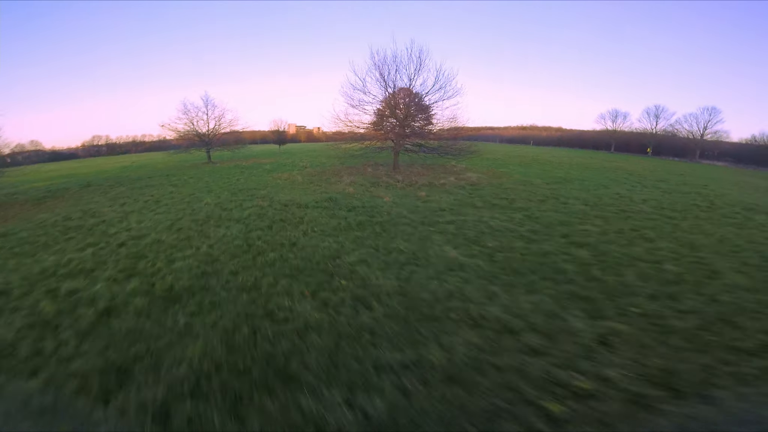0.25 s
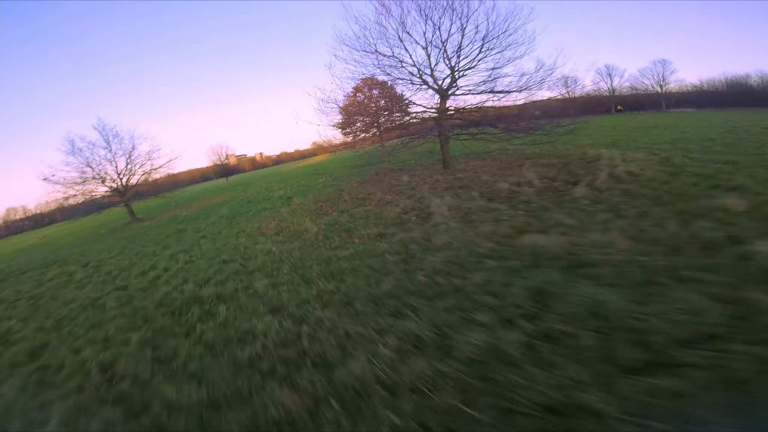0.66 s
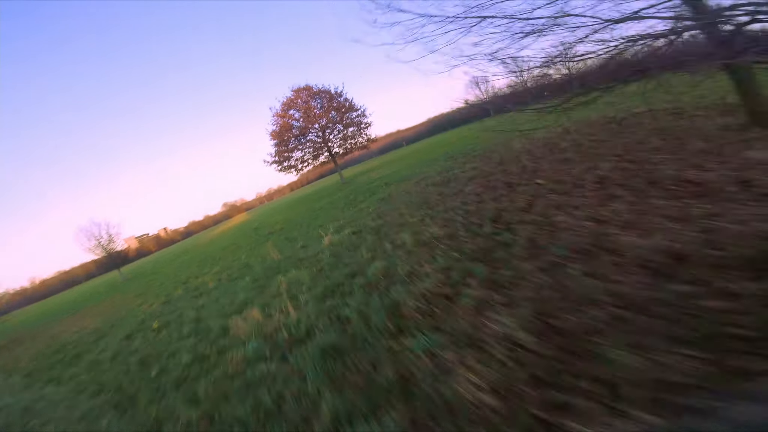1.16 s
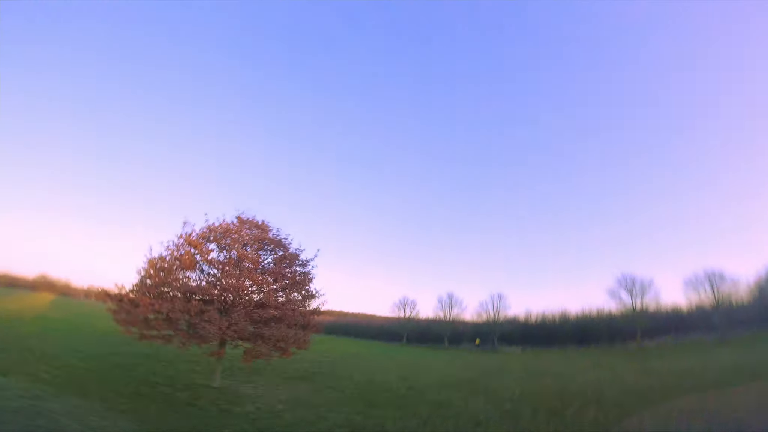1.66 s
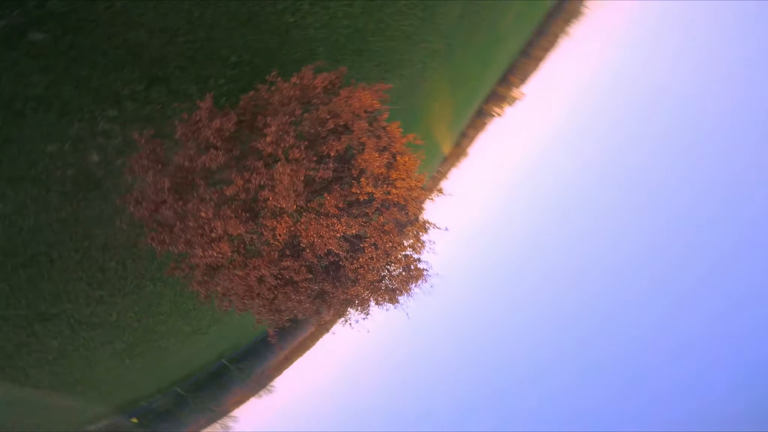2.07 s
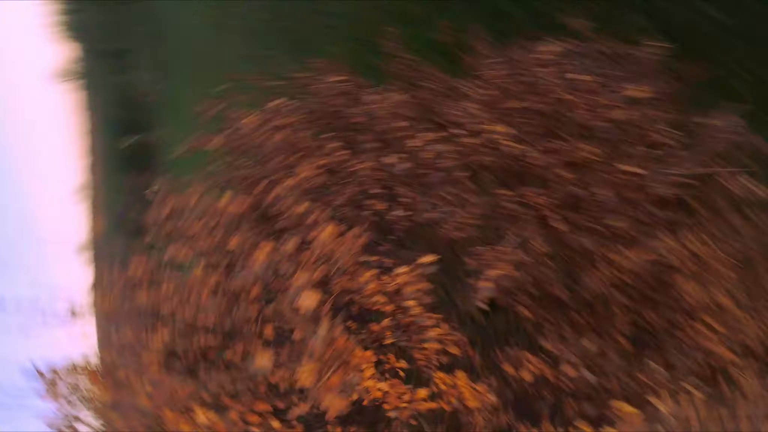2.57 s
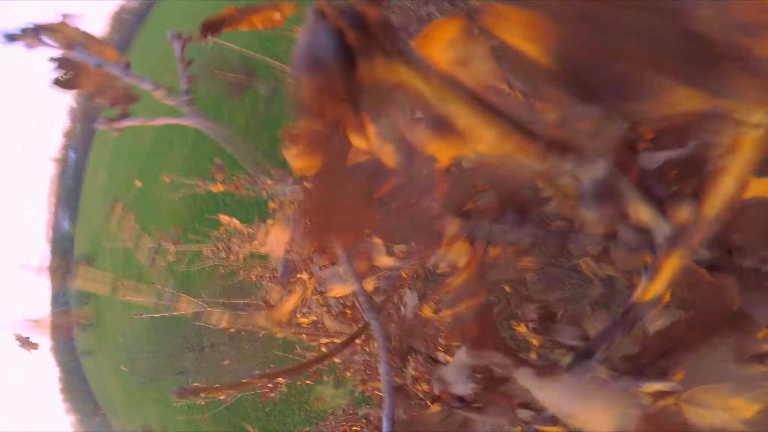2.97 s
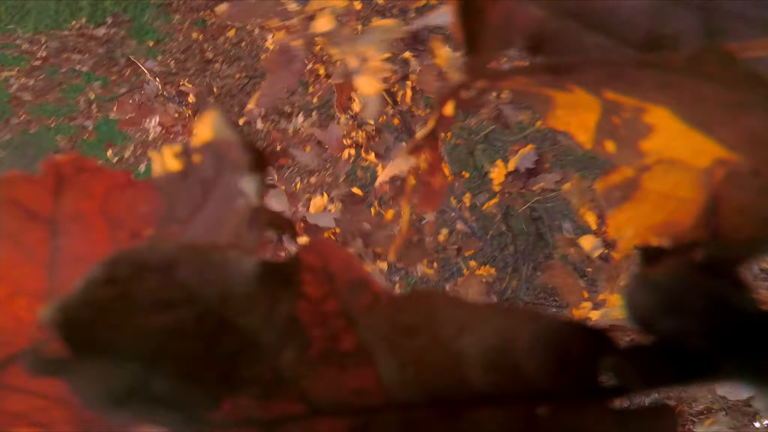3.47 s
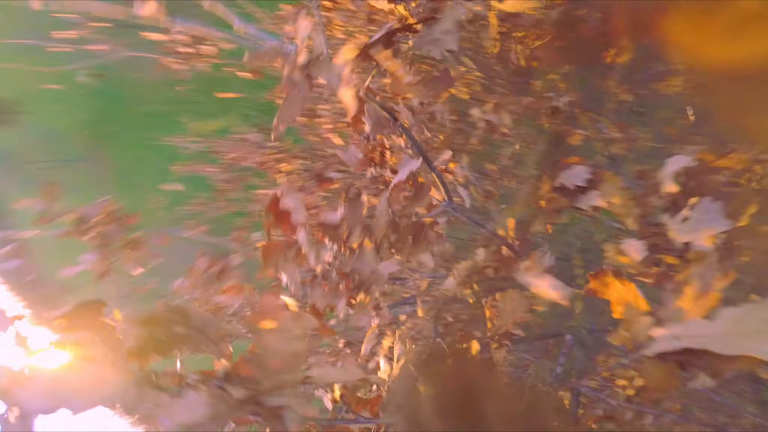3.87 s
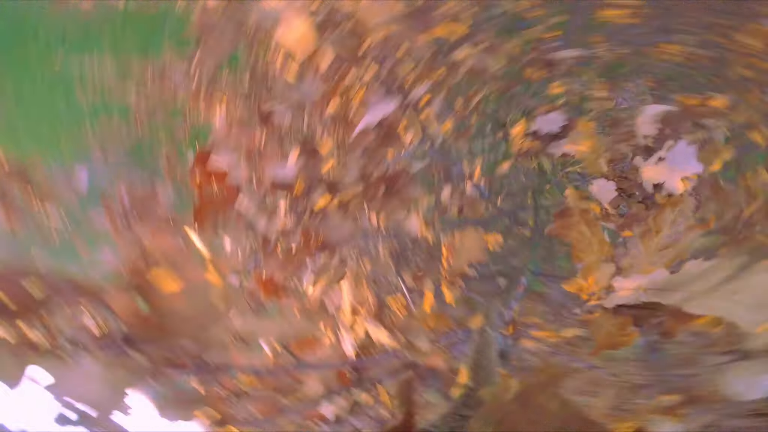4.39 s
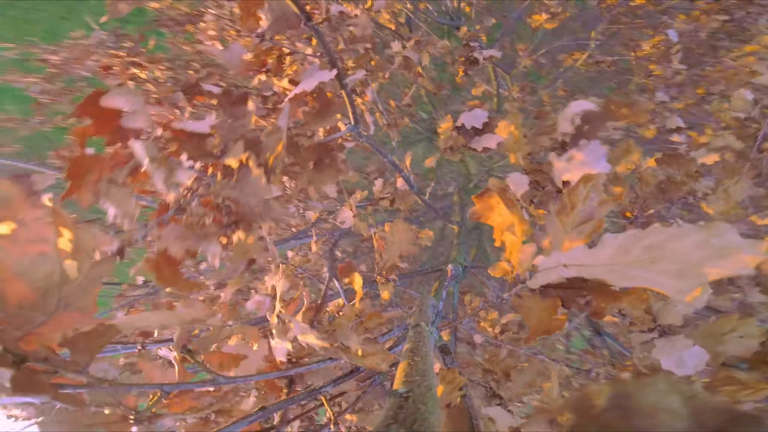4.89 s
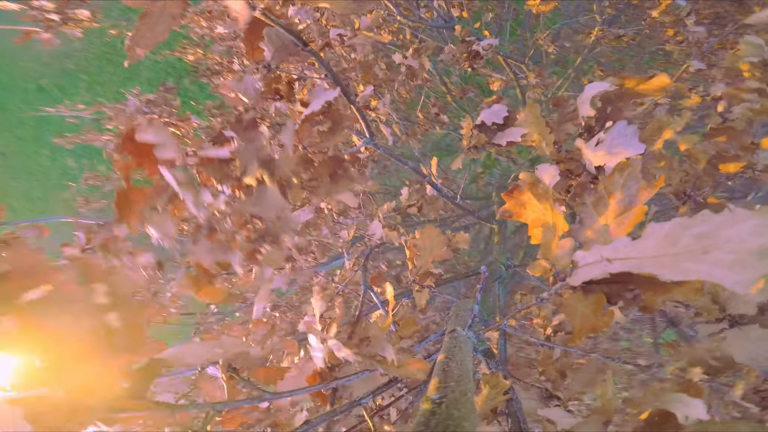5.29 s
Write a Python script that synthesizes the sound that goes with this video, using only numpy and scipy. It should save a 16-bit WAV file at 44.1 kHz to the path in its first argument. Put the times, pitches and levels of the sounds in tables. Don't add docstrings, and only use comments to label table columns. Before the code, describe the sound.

Buzzing drone motors surge and sink, a hard crash and stuttering stalls among branches follow, then sparse dry leaves tick and brush.

```python
import sys
import numpy as np
from scipy import signal
from scipy.fft import rfft, irfft
from scipy.io import wavfile
from scipy.ndimage import uniform_filter1d

SR = 44100
rng = np.random.default_rng(int(sys.argv[2]) if len(sys.argv) > 2 else 0)


def attenuation_scalar(level_db):
    decades = np.asarray(level_db, float) / 20
    return 10 ** decades


def persist_wave(psi):
    counts = np.round(np.clip(psi, -1, 1) * 32767).astype(np.int16)
    wavfile.write(sys.argv[1], SR, np.atleast_2d(counts).T)


N = 244314
T = np.arange(N) / SR

# [t/s, shaft f/Hz, blade tone level/dB]
LEAD_MOTOR = [(0, 258.2, -21), (.32, 233.6, -22), (.8, 231.5, -18), (.9, 249.7, -19.5), (1.04, 284.6, -20),
              (1.48, 370.3, -18.5), (1.58, 389.1, -21.5), (1.63, 374.4, -18), (1.69, 250.6, -20),
              (1.72, 162.7, -22.5), (1.84, 143.7, -13.5), (1.88, 110.6, -28), (1.99, 94.3, -14),
              (2.2, 79.84, -25.5), (2.48, 95.8, -13.5), (2.58, 149.6, -21), (2.66, 298.7, -20.5),
              (2.708, 348.3, -13.5)]
# [f/Hz, density/dB per Hz]
CRACKLE_COLOUR = [(3000, -18), (5000, -8), (8000, -3), (12000, -1.5), (16000, -6)]


def level(x, db):
    return x * attenuation_scalar(db) / np.sqrt(np.mean(x ** 2))


def columns(rows, fade_s=0.017):
    s, *values = np.transpose(rows)
    edge = np.minimum(T - s[0] + fade_s, s[-1] + fade_s - T)
    gate = np.clip(edge / fade_s, 0, 1)
    return [np.interp(T, s, v) for v in values] + [gate]


def colour(x, points, size=4096):
    hz, db = np.transpose(points)
    grid = np.log(np.arange(size // 2 + 1) * SR / size + 1)
    cepstrum = irfft(np.interp(grid, np.log(hz), db) * np.log(10) / 20)
    cepstrum[1:size // 2] *= 2
    cepstrum[size // 2 + 1:] = 0
    impulse = irfft(np.exp(rfft(cepstrum)))
    return signal.fftconvolve(x, impulse)[:len(x)]


def walk(rate):
    hold = int(SR / rate)
    steps = np.repeat(rng.standard_normal(N // hold + 1), hold)
    return 1.3 * uniform_filter1d(uniform_filter1d(steps, hold), hold)[:N]


def ring(hz, width_hz, size=3000):
    t = np.arange(size) / SR
    return np.sin(2 * np.pi * hz * t) * np.exp(-np.pi * width_hz * t)


def propeller(course, overtones, wobble, flutter_db, twice_db, top_db, unbalance_db, idle_hz=195, pole_db=-90):
    # [f/Hz, level/dB]
    frame_pass = [(45, -49), (90, -11), (150, -16), (200, 0.9), (235, -5.5), (290, -3.5), (350, -18.5),
                  (450, 11)]
    # [f/Hz, level/dB]
    arm_pass = [(400, -20), (450, 6), (650, 2.5)]
    idle_dull_db = 8.5
    brake_dull_db = .004
    gentle_hz_per_s = 650
    unloaded_s, linger = 0.14, 3
    magnets = 14
    pole_fade_db, pole_idle_hz = 24, 95
    hz, blade_db, gate = course

    uneven = wobble * np.clip(200 / hz, 1, 2.6) ** 1.19 * walk(60)
    turn = 2 * np.pi * (np.cumsum(hz * (1 + uneven)) / SR + rng.random())
    *first, fall_db = overtones
    gains = [0, *first] + [first[-1] + fall_db * k for k in range(1, 9)]

    dull_db = idle_dull_db * np.clip(np.log2(hz / idle_hz), -2, 0)
    slope = uniform_filter1d(np.gradient(hz) * SR, 800)
    braking = np.clip(slope + gentle_hz_per_s, -2500, 0)
    keep = np.exp(-1 / (unloaded_s * SR))
    unloaded = signal.lfilter([1 - keep], [1, -keep], braking)
    dull_db = dull_db + brake_dull_db * (0.2 * braking + linger * unloaded)
    flutter_db = flutter_db - 0.16 * dull_db

    blades = np.zeros(N)
    for k, db in enumerate(gains):
        multiple = 3 * (k + 1)
        housing_db = top_db * np.log2(np.maximum(multiple * hz / 2300, 1))
        flutter = flutter_db * np.clip(walk(45), -3, 1.5)
        tone_db = db + min(k, 2) * dull_db - housing_db + flutter
        blades += attenuation_scalar(tone_db) * np.sin(multiple * turn + k * k)

    shaft_db = unbalance_db + np.interp(hz, *np.transpose(frame_pass))
    shake_db = shaft_db + 0.023 * unloaded + 0.27 * flutter_db * walk(25)
    arm_db = twice_db + np.interp(2 * hz, *np.transpose(arm_pass)) + flutter_db * walk(40)
    fade_db = pole_fade_db * np.log2(np.maximum(hz / pole_idle_hz, 1))
    whistle_db = pole_db - fade_db + 4.5 * np.minimum(walk(30), 1)
    shake = attenuation_scalar(shake_db) * np.sin(turn)
    twice = attenuation_scalar(arm_db) * np.sin(2 * turn)
    poles = attenuation_scalar(whistle_db) * np.sin(magnets * turn)
    return np.sqrt(2) * gate * (attenuation_scalar(blade_db) * blades + shake + twice + poles)


def free_motors():
    # [t/s, shaft f/Hz, blade tone level/dB]
    second = [(0, 222.5, -18.5), (0.351, 203, -20.5), (0.601, 201.4, -22), (.81, 198, -21.5),
              (0.9, 207, -18), (1.051, 234.6, -14.5), (1.37, 287.8, -13.5), (1.571, 321.5, -12),
              (1.62, 311.4, -13), (1.661, 252.7, -21), (1.71, 150, -22.5), (1.78, 131, -25),
              (1.86, 45, -18.5), (1.899, 44.02, -11), (1.98, 43.5, -9.5), (2.02, 43.9, -21),
              (2.12, 43.72, -11.5), (2.17, 43.5, -22)]
    third = [(0, 210.2, -17.5), (0.351, 180.2, -17), (0.799, 177.2, -16), (0.899, 195.3, -20),
             (1.2, 259, -16.5), (1.3, 295.2, -28), (1.58, 335.2, -23.5), (1.641, 291.2, -18.5),
             (1.698, 169.6, -38), (1.78, 101.2, -23), (1.901, 96.7, -28), (2, 70, -32), (2.1, 69.7, -19),
             (2.2, 68.1, -16), (2.279, 39.5, -13.5), (2.4, 38.8, -19.5), (2.5, 43.7, -15.5),
             (2.681, 39.6, -21.5)]
    fourth = [(0, 194, -30.5), (0.303, 172.1, -32.5), (0.702, 162.9, -33.5), (0.798, 167.2, -31),
              (1, 185.2, -35.5), (1.15, 196, -56.5)]
    # [2nd level/dB, 3rd level/dB, 4th level/dB, further fall/dB]
    timbres = [(-6, -12, -14, -10), (-10, -19.5, -28, -8), (-9.5, -29.5, -22, -9), (6.5, 1, -16.5, -12)]
    unbalances = (-28.5, -9.5, -16.5, -31.5)
    pole_levels = (-33, -42, -36, -60)
    twice_levels = (-38.0, -35.5, -75.5, -51)
    courses = (LEAD_MOTOR, second, third, fourth)
    out = np.zeros(N)
    for rows, timbre, twice_db, unbalance_db, pole_db in zip(
            courses, timbres, twice_levels, unbalances, pole_levels):
        out += propeller(columns(rows), timbre, 0.00488, 1.0, twice_db, .2, unbalance_db, pole_db=pole_db)
    return out


def fighting_motor():
    # [t/s, shaft f/Hz, blade tone level/dB]
    grab = [(2.488, 150, -50), (2.5, 172, -21), (2.518, 235, -22), (2.53, 345, -25), (2.55, 415, -22),
            (2.582, 420, -21), (2.588, 420, -60)]
    spin_up = [(2.592, 90, -60), (2.6, 105, -21), (2.62, 180, -18), (2.645, 270, -17), (2.67, 385, -18),
               (2.705, 428, -16), (2.72, 428, -60)]
    sputter = [(3.03, 55, -60), (3.045, 70, -19), (3.07, 185, -16), (3.097, 265, -16), (3.11, 240, -28),
               (3.14, 228, -29), (3.175, 105, -32), (3.19, 80, -60)]
    climb = [(3.275, 45, -60), (3.29, 52, -17), (3.33, 138, -16), (3.36, 165, -22), (3.38, 204, -19),
             (3.4, 258.5, -12), (3.425, 258, -15), (3.44, 284, -22), (3.455, 284, -50)]
    sag = [(3.485, 262, -50), (3.5, 260, -26), (3.52, 259, -19), (3.54, 243, -18), (3.56, 228.5, -24),
           (3.578, 185, -24), (3.6, 178, -20), (3.62, 193, -21), (3.63, 193, -50)]
    # [2nd level/dB, 3rd level/dB, 4th level/dB, further fall/dB]
    timbre = (-10, -21, -25, -5)
    course = columns(grab + spin_up + sputter + climb + sag)
    return propeller(course, timbre, .02, 2.6, -43.5, 3, -91, idle_hz=150)


def surge_course():
    # [t/s, length/s, from f/Hz, to f/Hz, blade tone level/dB]
    bursts = [
        (2.484, 0.059, 61.4, 67, -12.5),
        (2.867, 0.035, 402, 320, -9),
        (2.925, 0.07, 100.3, 135, -13),
        (3.21, 0.056, 242.3, 257, -19),
        (3.628, 0.0361, 146.8, 81.5, -20),
        (3.68, 0.33, 79.4, 76, -47.5),
    ]
    ease, swell = 2.2, 1
    hz, db, gate = np.full(N, 100.), np.full(N, -60.), np.zeros(N)
    for s, length, from_hz, to_hz, top_db in bursts:
        u = (T - s) / length
        on = (u >= 0) & (u < 1)
        hz[u >= 0] = to_hz
        hz[on] = to_hz + (from_hz - to_hz) * (1 - u[on]) ** ease
        db[on] = top_db
        gate[on] = np.sin(np.pi * u[on]) ** swell
    return hz, db, gate


def surging_motors():
    # [2nd level/dB, 3rd level/dB, 4th level/dB, further fall/dB]
    timbre = (-15, -32, -35, -7)
    return propeller(surge_course(), timbre, .03, 4.9, -40, 4.4, -36.0)


def freed_motor():
    # [t/s, shaft f/Hz, blade tone level/dB]
    course = [(3.41, 132, -45), (3.425, 140, -33), (3.445, 177.5, -32), (3.46, 173.5, -31),
              (3.48, 154.5, -32), (3.5, 150.8, -32), (3.525, 149, -36), (3.56, 130, -44)]
    # [2nd level/dB, 3rd level/dB, 4th level/dB, further fall/dB]
    timbre = (10, 8, -3, -4)
    return propeller(columns(course), timbre, .02, 4.5, -9, 3.7, -36, idle_hz=45)


def blade_scream():
    # [t/s, shaft f/Hz, blade tone level/dB]
    course = [(2.815, 372, -34), (2.83, 420, -25), (2.845, 396, -22), (2.858, 404, -18), (2.872, 382, -13)]
    # [2nd level/dB, 3rd level/dB, 4th level/dB, further fall/dB]
    timbre = (-9, -15, -11.5, 2)
    return propeller(columns(course), timbre, 0.046, 1.8, -49.0, 2.4, -44.0)


def windings():
    # [t/s, f/Hz, level/dB]
    idle = [(1.8, 7049, -50), (1.88, 6860, -41), (2.08, 7099, -38), (2.2, 7000, -38), (2.33, 6950, -40),
            (2.5, 6900, -38)]
    arch = [(1.93, 2750, -50), (1.98, 3150, -43), (2.03, 3450, -41), (2.1, 3200, -39), (2.15, 2950, -40),
            (2.22, 2900, -48)]
    load = [(2.37, 1190, -40), (2.4, 1240, -24), (2.455, 1340, -23), (2.475, 1370, -40)]
    rise = [(2.46, 8504, -48), (2.5, 8700, -36), (2.53, 9700, -31), (2.555, 10800, -30)]
    stop = [(3.62, 7050, -60), (3.72, 6850, -70), (3.85, 6800, -72)]
    out = np.zeros(N)
    for rows in (idle, arch, load, rise, stop):
        hz, db, gate = columns(rows)
        ragged = attenuation_scalar(2.5 * walk(25)) * walk(450)
        out += gate * attenuation_scalar(db) * ragged * np.sin(2 * np.pi * np.cumsum(hz) / SR)
    return out


def contacts(rate, spread_db, tail_s, bed_db):
    size_db = np.minimum(spread_db * rng.exponential(size=N), 16)
    touch = (rng.random(N) < rate / SR) * attenuation_scalar(size_db)
    power = signal.lfilter([1], [1, -np.exp(-2 / (tail_s * SR))], touch ** 2)
    power = uniform_filter1d(power, int(1.3 * tail_s * SR) + 1)
    return level(np.sqrt(power / power.mean() + attenuation_scalar(2 * bed_db)), 0)


def contact_db(twig_db, leaf_db, weight_db=0):
    thud_db = -11 + 0.53 * twig_db + weight_db
    crackle_db = leaf_db - 10.5 - 0.13 * twig_db
    return np.array([thud_db, twig_db, leaf_db, crackle_db])


def patchy(x, patch_db, rate):
    spectrum = rfft(x)
    octave = np.log2(np.arange(N // 2 + 1) * SR / N + 1)
    shares = [np.clip(1 - 3 * abs(octave - c), 0, 1) for c in np.arange(5, 11.6, 1 / 3)]
    out = irfft(spectrum * (1 - sum(shares)), N)
    for share in shares:
        out += irfft(spectrum * share, N) * attenuation_scalar(patch_db * walk(rate))
    return out


def tree():
    # [t/s, twig level/dB, leaf level/dB, extra weight level/dB]
    rubbing = [(2.5, -16.5, -34.5, -11.5), (2.57, -24.5, -31, 10.5), (2.7, -14.5, -35, -2),
               (2.79, -17.5, -28.5, -9), (2.85, -22.5, -35, -4.5), (2.9, -14.5, -35, 4.5),
               (3.1, -14, -49, 3), (3.12, -34.5, -51.5, 1), (3.21, -34.5, -48.5, 6.5),
               (3.29, -18, -48, 1.5), (3.4, -19.5, -32, 1), (3.49, -26, -36, -2), (3.62, -22, -33, -7.5),
               (3.7, -48, -73, -6.5), (4.1, -62, -68, -2), (4.66, -57, -58.5, -4), (5.1, -43.5, -52, -2),
               (5.54, -37.5, -40.5, 0.5)]
    # [t/s, length/s, twig level/dB, leaf level/dB, extra weight level/dB]
    whips = [(2.674, 0.042, -40, -20, 9), (2.741, 0.038, -8, -18.5, -3), (2.804, 0.013, -7.5, -27.5, -6.5),
             (2.869, 0.039, -9.5, -19.5, -3), (2.904, 0.073, -6.5, -29, -5.5),
             (2.981, 0.016, -13, -37.5, 6), (3.001, 0.013, -26, -37.5, -1),
             (3.048, 0.032, -12, -37.5, -1.5), (3.078, 0.0085, -19, -43, 11),
             (3.202, 0.017, -15, -39.5, -11.5), (3.22, 0.023, -15, -61, 4.5), (3.309, 0.052, -11.5, -36, 2),
             (3.355, 0.017, -8.5, -44.5, -0.5), (3.62, 0.03, -12, -34.5, -9.5)]
    # [t/s, length/s, twig level/dB, leaf level/dB, extra weight level/dB]
    brushes = [(3.824, 0.016, -46, -65, -18), (3.843, 0.11, -44.5, -56, -12.5),
               (3.911, 0.018, -44.5, -59, -2), (3.943, 0.1, -57, -57, 5.5), (4.178, 0.09, -56.5, -83, 4.5),
               (4.379, 0.053, -53, -57, -5.5), (4.425, 0.11, -39.5, -57, 1),
               (4.479, 0.066, -42.5, -43.5, 8), (4.547, 0.06, -66.5, -55, 5.5),
               (4.763, 0.016, -63, -54, -17), (4.807, 0.082, -51.5, -60, 4.5),
               (4.975, 0.11, -40.5, -43.5, 4.5), (5.142, 0.009, -64, -45, -13),
               (5.272, 0.031, -54, -42, 3.5), (5.405, 0.029, -31.5, -45.5, 2),
               (5.498, 0.064, -35, -55, 3.5)]
    # [f/Hz, density/dB per Hz]
    thud = [(20, -27.5), (50, -8.5), (120, 4), (240, 4), (400, -4), (900, -38)]
    scrape = [(150, -7.5), (320, -16), (500, -1), (800, 2), (1300, -6), (1700, -12), (3000, -42)]
    rasp = [(700, -8.5), (1500, -6.5), (2050, -7), (2600, -5.5), (3700, -4.5), (4500, -7.5), (6000, -33.5)]
    twigs = contacts(120, 2.6, 0.0047, 1.0)
    leaves = contacts(190, 4.2, 0.0013, -1.1)
    *dbs, gate = columns(rubbing)
    power = (gate * attenuation_scalar(contact_db(*dbs))) ** 2
    for s, length, *db in whips + brushes:
        u = np.clip((T - s) / length, 0, 1)
        stroke = 1.24 * np.sin(np.pi * u ** 0.65) ** 1.18
        power += np.outer(attenuation_scalar(2 * contact_db(*db)), stroke)
    both = np.sqrt(twigs * leaves)
    touches = ((twigs, thud, -2.5), (twigs, scrape, -3.0), (both, rasp, -3.0), (leaves, CRACKLE_COLOUR, 8.5))
    out = np.zeros(N)
    for (touch, shape, trim_db), p in zip(touches, power):
        noise = colour(touch * rng.standard_normal(N), shape)
        out += level(noise, trim_db) * np.sqrt(p)
    return patchy(out, 2.6, 60)


def blows():
    # [t/s, peak level/dB, main ring f/Hz, tick level against the peak/dB]
    hits = [(2.705, 1, 770, -20), (2.708, -10.5, 1497, 8.5), (2.805, -9, 720, -12.5),
            (2.922, -9, 139.9, -41), (2.985, -6, 700, -35), (3.011, -12, 910, -35), (3.068, -7.5, 580, -25),
            (3.207, -10, 775, -34), (3.302, -4, 792, -41), (3.626, -7.5, 750, -35), (3.634, -9, 262, -45),
            (3.86, -30, 785, -23), (4.025, -27, 98, -39), (4.245, -30, 106, -41), (4.59, -31, 94.5, -43),
            (4.185, -38, 616, -33), (4.213, -28, 166, -46), (4.212, -32.5, 570, -41),
            (4.455, -43.5, 190, 13.5), (4.498, -35, 199, 2), (4.532, -22, 257, -27),
            (4.544, -23.5, 207, -31), (4.445, -35, 700, -30), (5.0, -24, 526, -15),
            (5.066, -24.5, 160, -41), (5.024, -24, 145, 0), (5.406, -20, 199, -25), (5.405, -25, 610, -31),
            (5.508, -43, 220, -25)]
    # [f/Hz, width/Hz, level/dB]
    modes = [(230, 180, 3.5), (720, 360, -22), (1087, 260, -22.5)]
    damping = .17
    out = np.zeros(N + 3000)
    frame = sum(attenuation_scalar(db) * ring(hz, width) for hz, width, db in modes)
    fade = np.exp(-np.arange(3000) / (0.0011 * SR))
    for s, db, hz, tick_db in hits:
        tick = colour(fade * rng.standard_normal(3000), CRACKLE_COLOUR, size=512)
        blow = ring(hz, damping * hz) + 0.13 * frame + attenuation_scalar(tick_db + 11.0) * tick
        i = int(s * SR)
        out[i:i + 3000] += attenuation_scalar(db + 2.5) * blow
    return out[:N]


def snaps():
    # [t/s, peak level/dB, dull part level/dB, bright part level/dB against the peak]
    leaf_hits = [(3.6869, -42.5, -5, -18), (3.7371, -54, -4, -20), (3.755, -50, -4, -21),
                 (3.796, -48, -7, -19), (3.8293, -44, -2, -23), (3.8501, -37.5, -2, -21),
                 (3.8626, -24.5, -13, -9.5), (3.888, -36, -9, -24), (3.9167, -45, -10, -10),
                 (3.9562, -45, -13, -11.5), (4.1263, -49, -15, -5), (4.1697, -55, -11, -12),
                 (4.239, -58, -12, -9), (4.261, -46, -13, -9.5), (4.3004, -51, -17, -4.5),
                 (4.3853, -39, -7, -15), (4.454, -27, -27, -9), (4.4915, -34, -14, -3),
                 (4.4972, -30, -14, -11), (4.5648, -37, -15, -9), (4.765, -39, -6.5, -14),
                 (4.8062, -40, -6.5, -5), (4.864, -44, -7, -13), (4.927, -42, -6, -11),
                 (4.9893, -34, -12, -4), (5.0232, -32, -26, -16), (5.0474, -25, -25, -4),
                 (5.1395, -37, -16, -9), (5.1784, -39, -9, -13), (5.2485, -38, -15, -3),
                 (5.274, -34, -15, 1), (5.366, -30, -16, -8), (5.423, -22.5, -16, -8),
                 (5.472, -37, -8, -11)]
    # [f/Hz, density/dB per Hz]
    body = [(500, -12), (1400, 1), (2050, -18), (2500, -1), (3600, -5), (4200, -14), (6000, -43)]
    out, t = np.zeros(N + 1500), np.arange(1500) / SR
    fade = np.exp(-t / 0.0039) * np.minimum(t / 0.00073, 1)
    for s, db, dull_db, bright_db in leaf_hits:
        dull = level(colour(rng.standard_normal(1500), body, size=512), 0)
        bright = level(colour(rng.standard_normal(1500), CRACKLE_COLOUR, size=512), 0)
        snap = attenuation_scalar(dull_db + 4) * dull + attenuation_scalar(bright_db + 5.5) * bright
        i = int(s * SR)
        out[i:i + 1500] += attenuation_scalar(db) * fade * snap
    return out[:N]


def ring_out():
    # [f/Hz, width/Hz, level/dB]
    modes = [(232, 8, -30), (430, 14, -39), (640, 13, -33), (780, 20, -30)]
    out, i = np.zeros(N), int(3.635 * SR)
    out[i:i + 16000] = sum(attenuation_scalar(db) * ring(hz, width, size=16000) for hz, width, db in modes)
    return out * attenuation_scalar(2.2 * walk(28.2))


def air():
    # [t/s, propeller wash level/dB, wind buffet level/dB]
    flow = [(0.0, -31, -21.5), (0.04, -32, -24), (0.99, -31.5, -24), (1.04, -31, -18.5), (1.64, -33.5, -19),
            (1.73, -40, -43.5), (2.53, -35, -46.5), (2.59, -26.5, -13.5), (2.71, -23.5, -10),
            (2.72, -28, -13)]
    # [f/Hz, density/dB per Hz]
    wash_colour = [(100, 0.5), (200, 3), (280, -6), (420, -12.5), (650, -9.5), (1000, -10), (1300, -7),
                   (1450, -8.5), (1750, -9), (2000, -16), (3200, -20), (6300, -24.5), (14000, -14.5)]
    buffet_colour = [(15, -7.5), (30, -14), (60, 4), (130, 2.5), (200, -21), (400, -23.5)]
    wash_db, wind_db, gate = columns(flow)
    bright_db = 5 * np.log2(columns(LEAD_MOTOR)[0] / 196)
    flutter = attenuation_scalar(1.6 * walk(150))
    wash = level(colour(rng.standard_normal(N) * flutter, wash_colour), 16.4)
    low = signal.lfilter(*signal.butter(2, 2500, fs=SR), wash)
    wash = low * attenuation_scalar(-bright_db) + wash - low
    gusts = attenuation_scalar(0.39 * walk(12.0))
    wind = level(colour(rng.standard_normal(N), buffet_colour), 0.32) * gusts
    return gate * (wash * attenuation_scalar(wash_db) + wind * attenuation_scalar(wind_db))


def scene():
    motors = free_motors() + fighting_motor() + surging_motors() + freed_motor() + blade_scream() + windings()
    contact = tree() + blows() + snaps() + ring_out()
    return (motors + contact + air())[None]


def band_limit(x):
    return signal.sosfilt(signal.butter(12, 15140, fs=SR, output="sos"), x)


def record(dry):
    # [f/Hz, level/dB]
    port = [(20, 0.5), (3300, -2), (4200, -10.5), (4800, -13), (5600, -3), (6400, -0.5), (8000, -8),
            (9200, -17.5), (10500, -25.5), (11800, -41.5), (14800, -44.5), (15300, -42.5)]
    heard = colour(dry[0], port)[None]
    mix = np.tanh(.9 * heard) / .9
    return band_limit(mix)


dry = scene()
out = record(dry)
persist_wave(out)
```